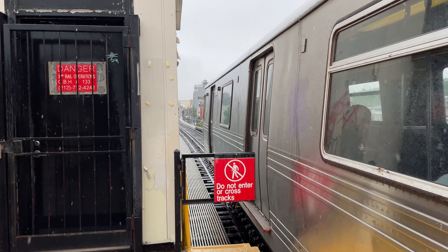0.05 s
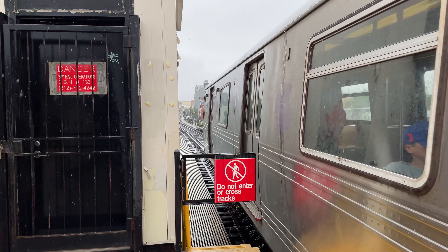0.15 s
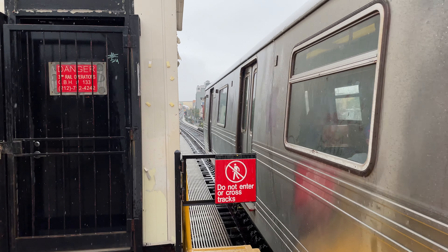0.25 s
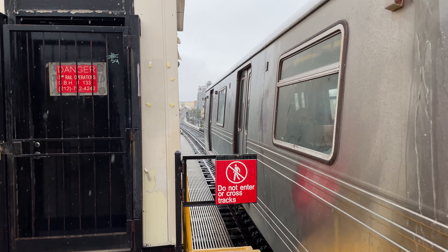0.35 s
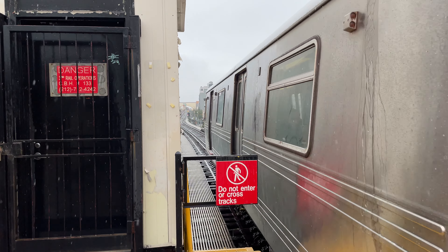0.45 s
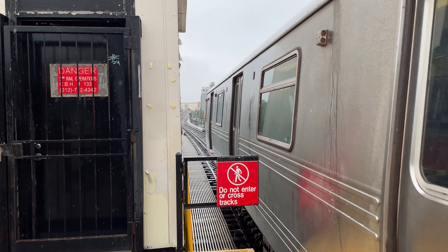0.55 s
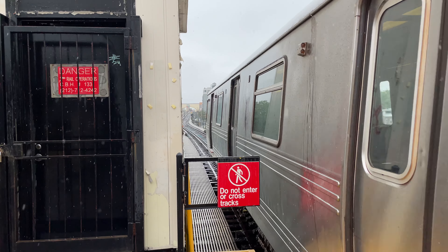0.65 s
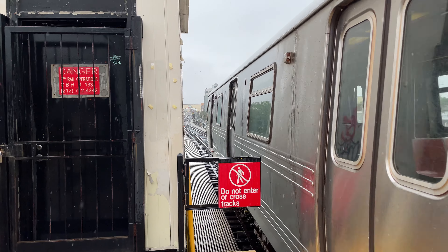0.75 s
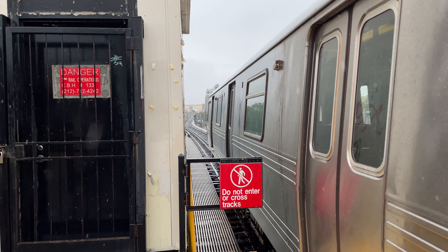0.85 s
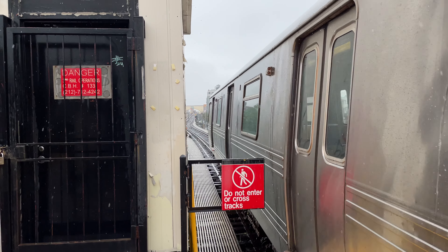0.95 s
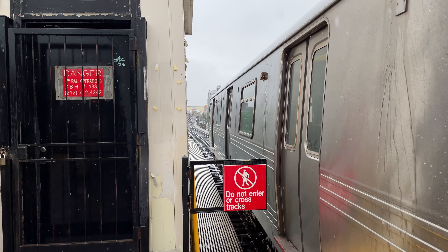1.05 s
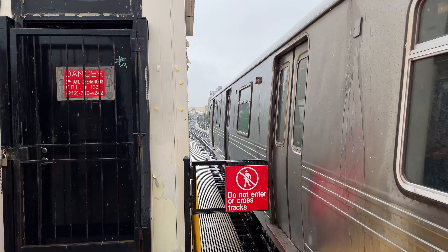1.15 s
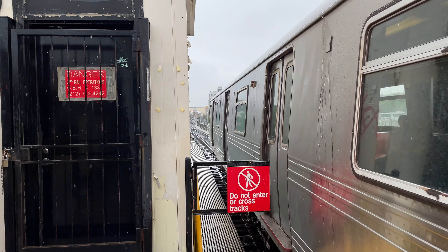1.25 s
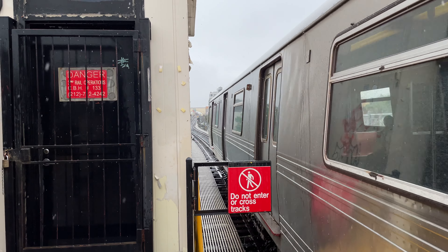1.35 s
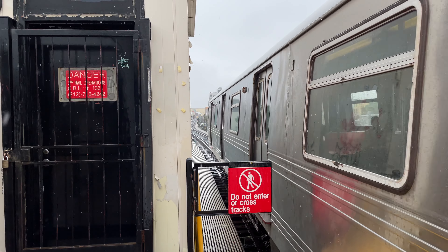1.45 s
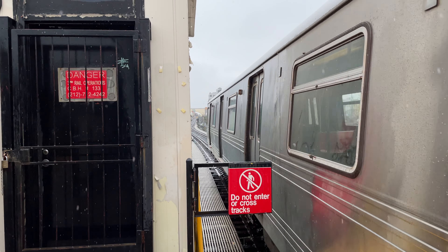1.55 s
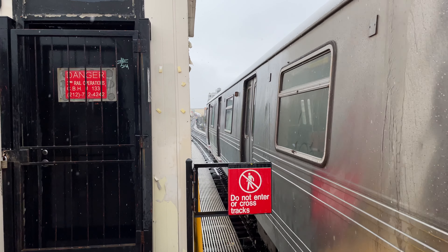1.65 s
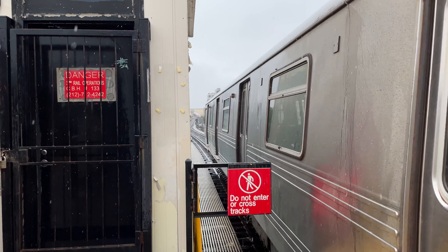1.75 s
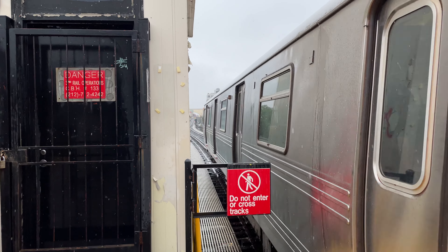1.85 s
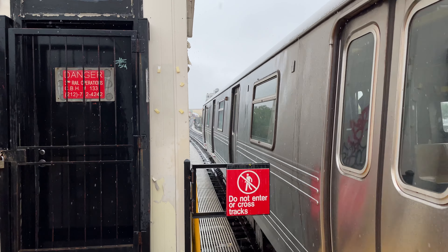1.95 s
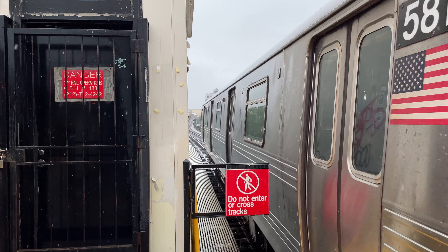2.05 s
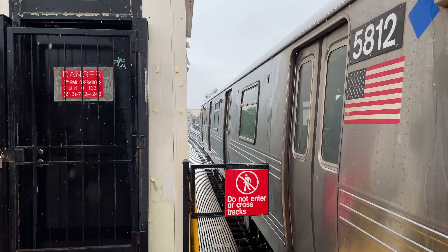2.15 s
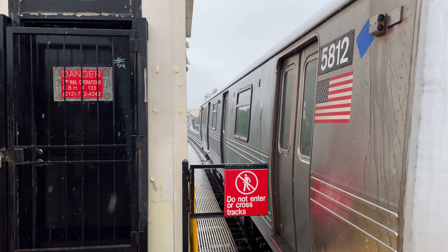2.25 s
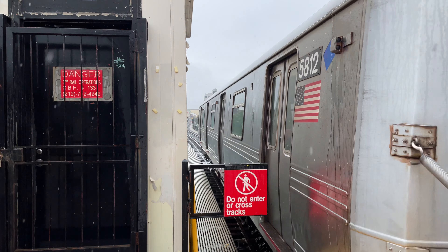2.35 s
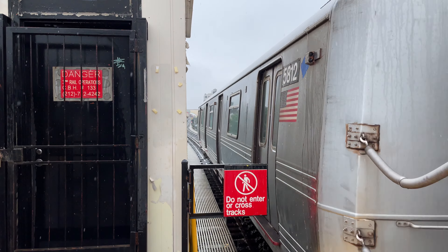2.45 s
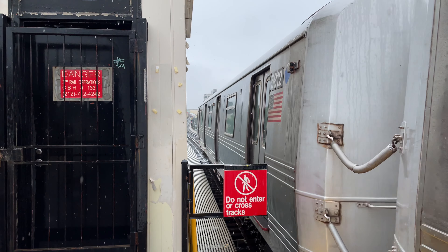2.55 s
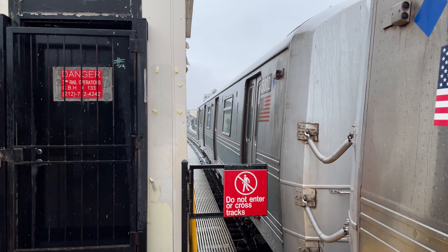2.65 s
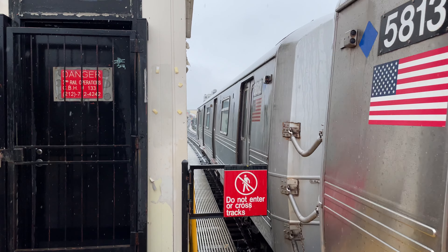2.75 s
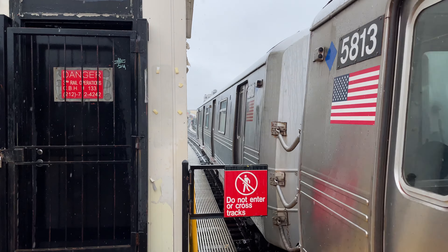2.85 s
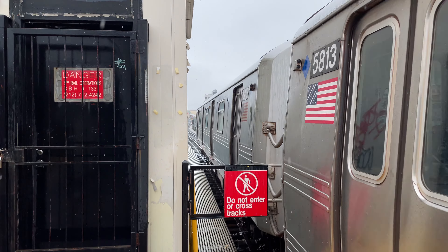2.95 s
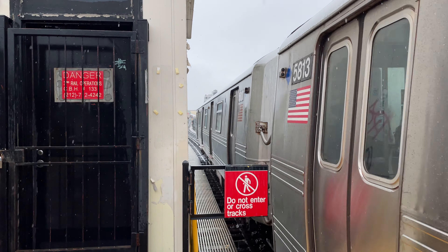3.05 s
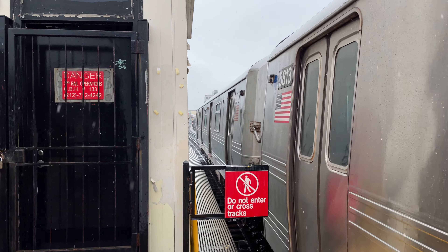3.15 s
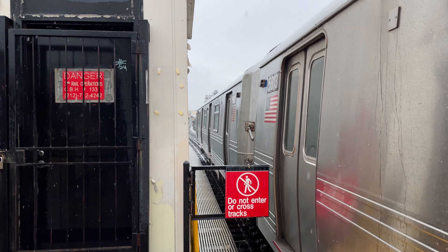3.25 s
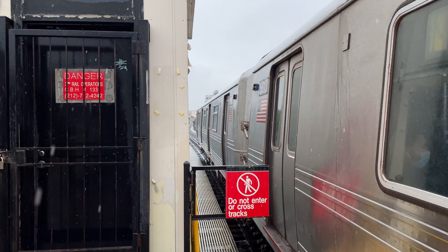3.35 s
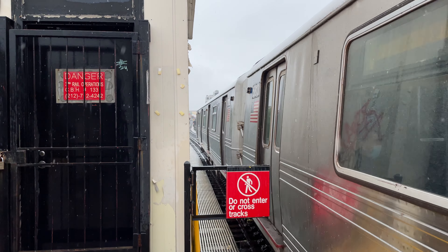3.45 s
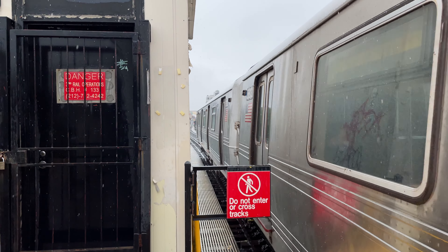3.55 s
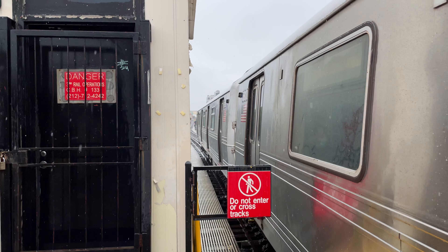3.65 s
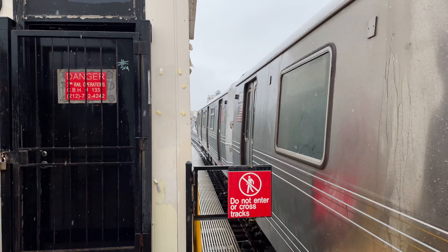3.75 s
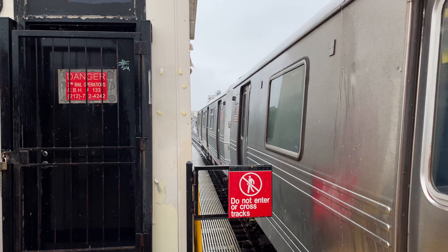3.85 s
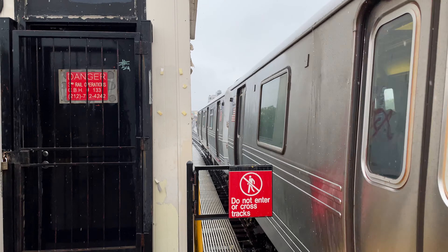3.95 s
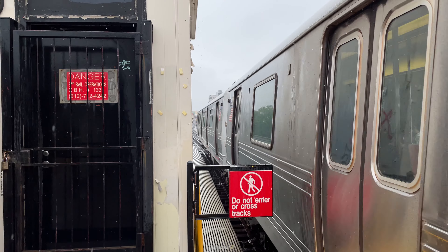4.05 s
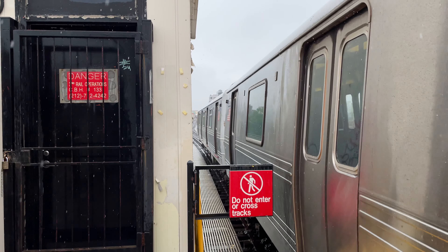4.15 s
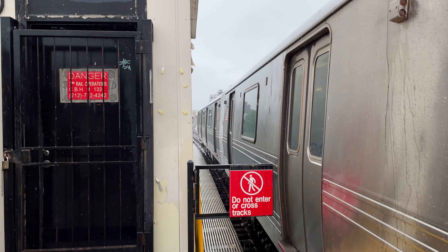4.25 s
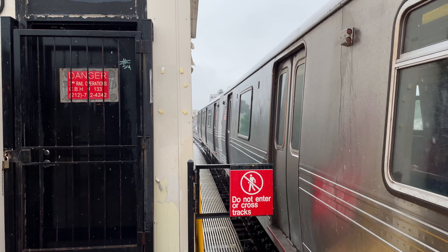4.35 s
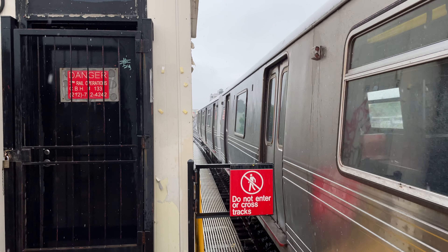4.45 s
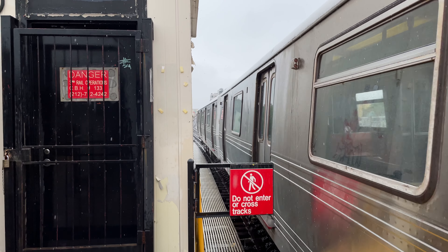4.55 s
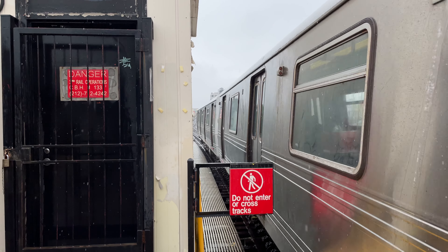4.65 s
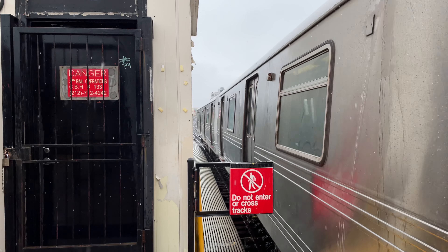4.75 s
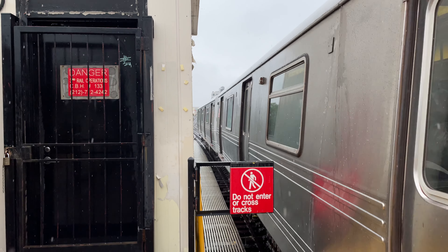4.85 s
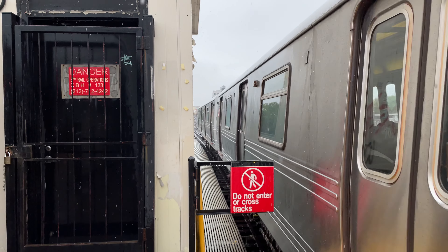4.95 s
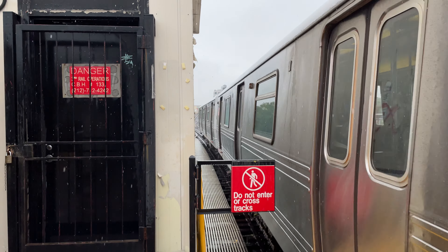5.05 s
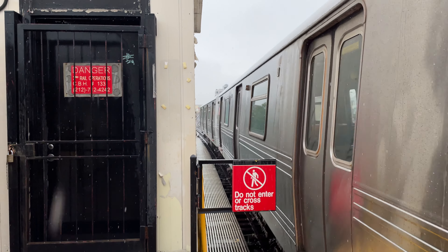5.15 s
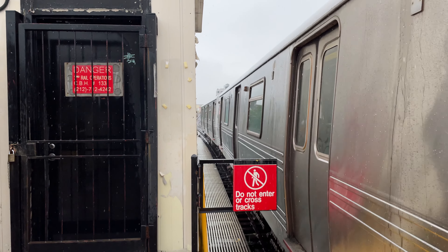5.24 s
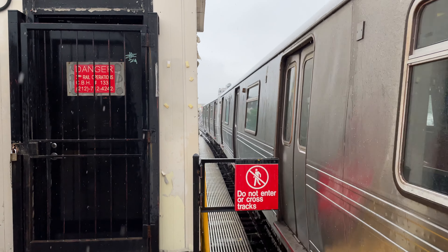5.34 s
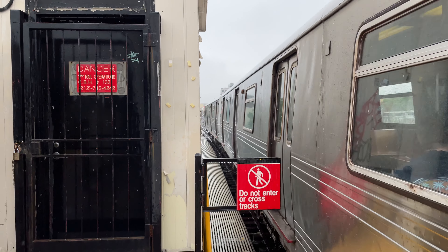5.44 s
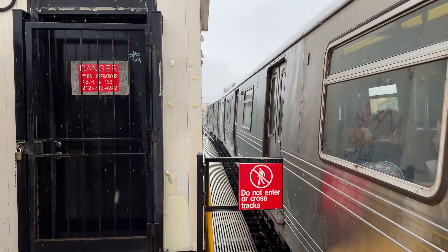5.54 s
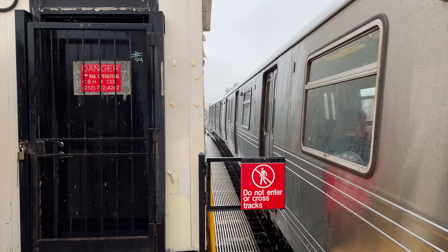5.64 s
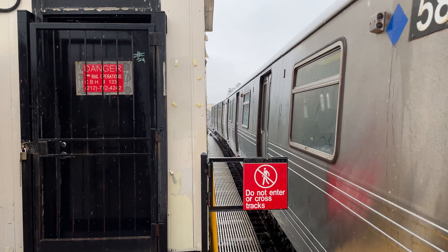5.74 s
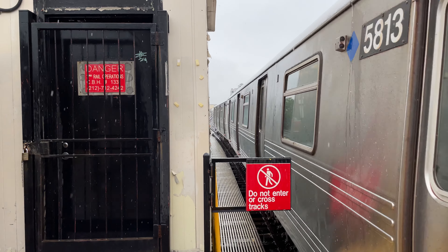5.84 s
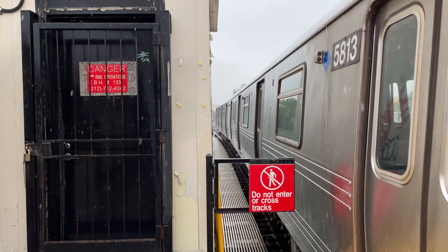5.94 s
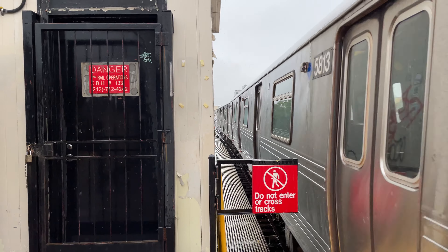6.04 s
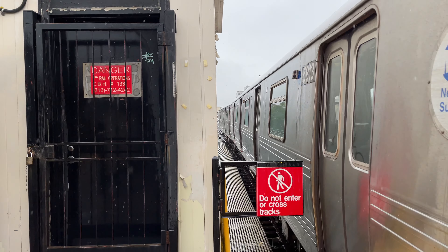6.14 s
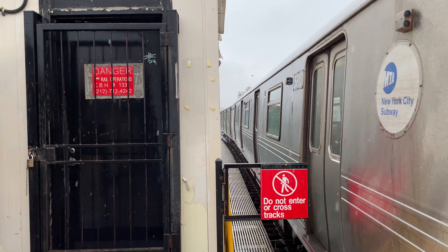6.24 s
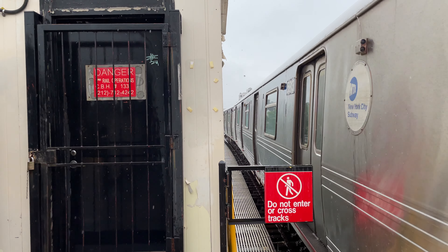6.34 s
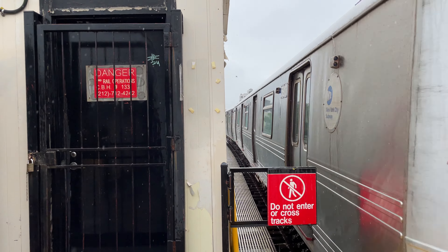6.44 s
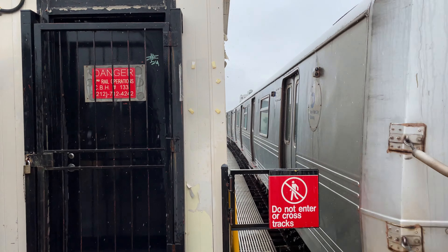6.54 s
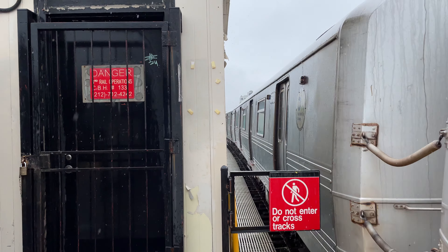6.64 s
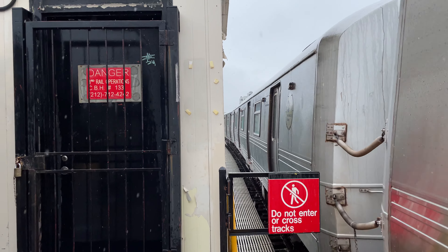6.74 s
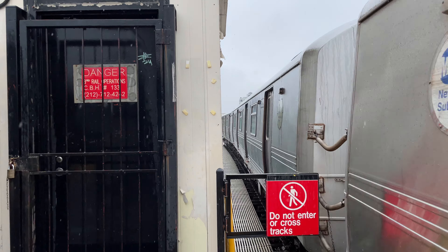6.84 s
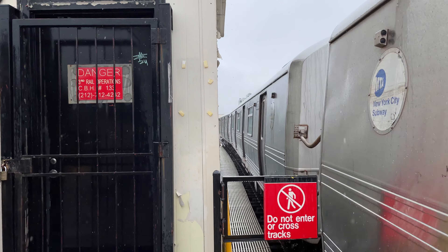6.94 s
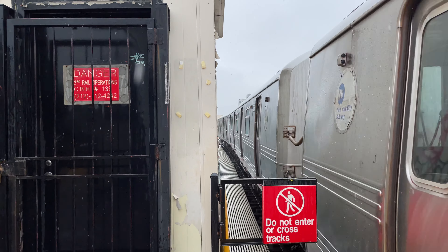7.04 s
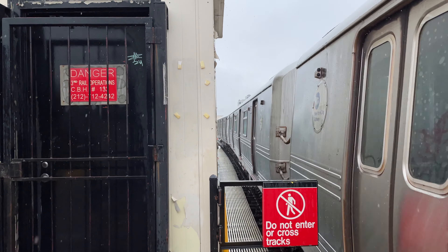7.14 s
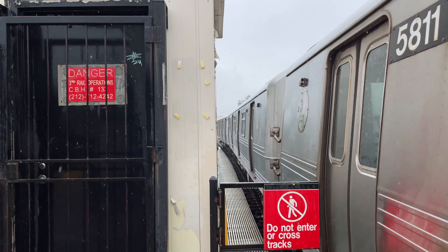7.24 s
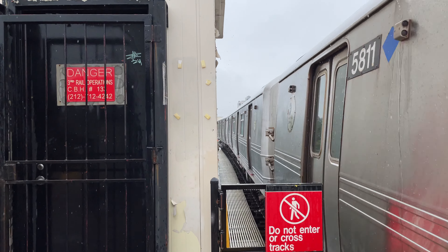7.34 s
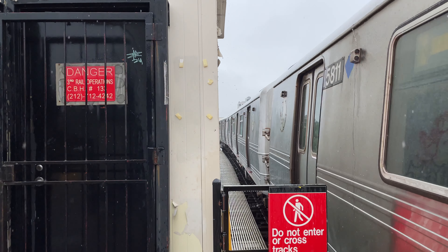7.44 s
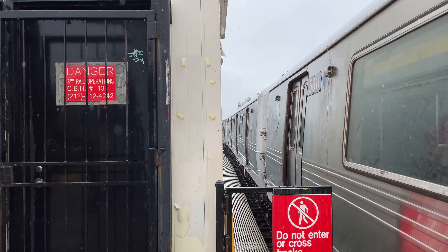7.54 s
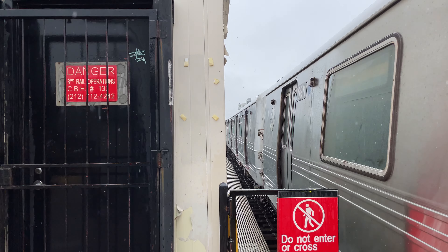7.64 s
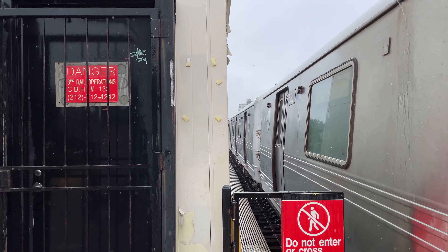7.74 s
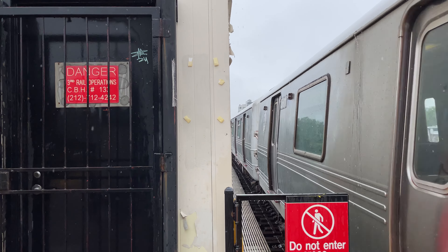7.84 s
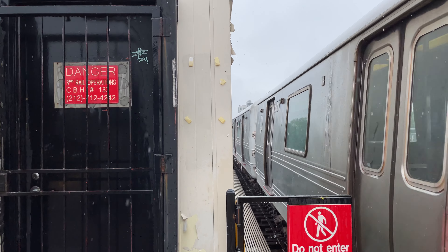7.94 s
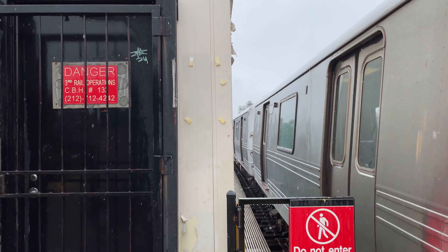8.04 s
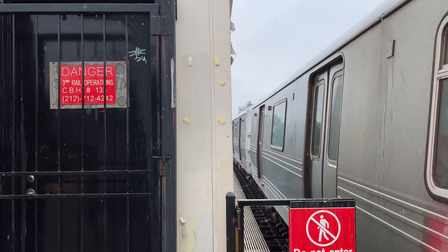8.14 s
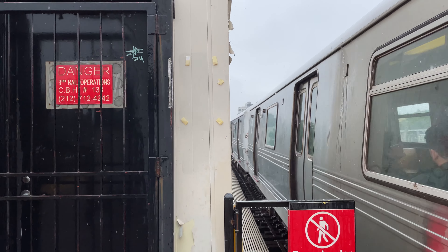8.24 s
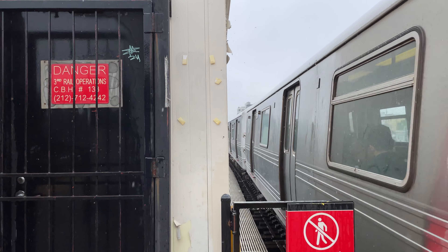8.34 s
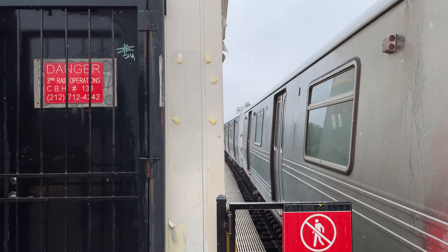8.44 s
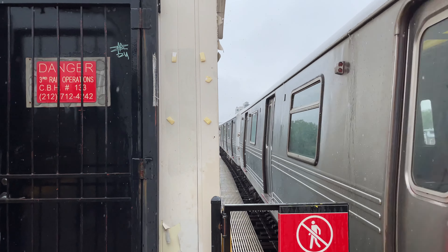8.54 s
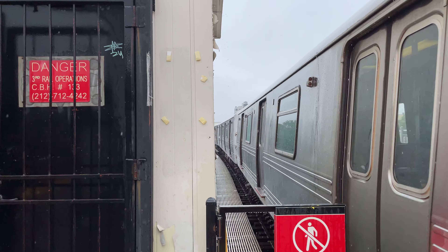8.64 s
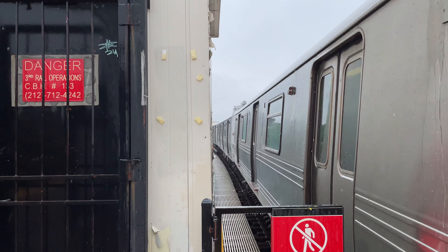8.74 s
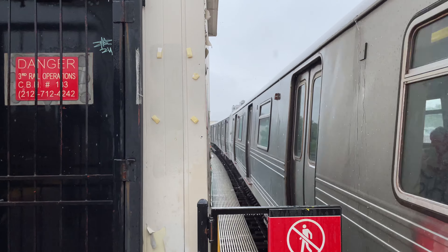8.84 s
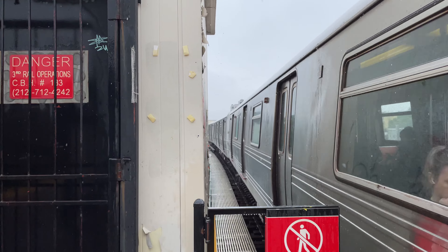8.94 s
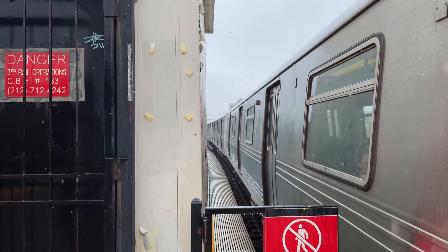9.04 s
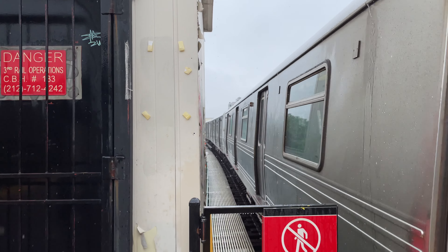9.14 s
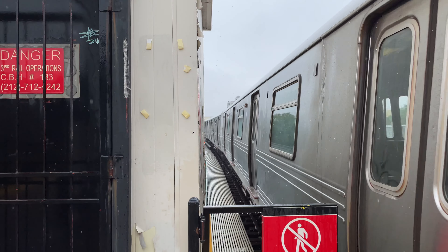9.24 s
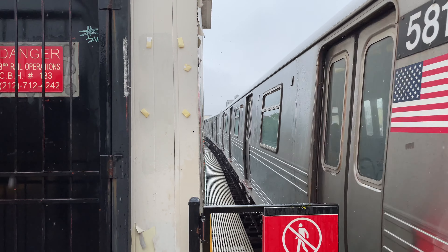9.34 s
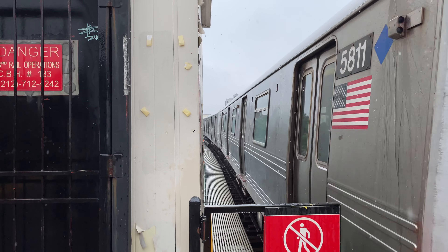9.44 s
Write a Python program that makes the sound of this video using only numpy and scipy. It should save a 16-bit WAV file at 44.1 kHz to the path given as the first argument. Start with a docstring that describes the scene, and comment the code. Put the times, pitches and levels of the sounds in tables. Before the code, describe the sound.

A subway train gathers speed close by on an elevated platform, motor gears whining upward over a deep rumble as wheels clack and thud across a rail joint.

```python
"""Elevated platform, two microphone ports of a phone an arm's length from a subway train gathering speed.
From the start air hisses under the cars, the steel viaduct rumbles, wheels roar and motor gears whine upward.
Soon axle after axle clacks, rings and thuds over a rail joint; a hum goes by, then suspension parts groan.
A flange chirps thinly against the rail, the strongest air jet blows by and small metal parts tick;
the whine and the joint blows are loudest near the end. Shaped noise, damped modes and sines make it all."""
import sys
import numpy as np
from scipy import signal
from scipy.fft import rfft, irfft
from scipy.io import wavfile
from scipy.ndimage import uniform_filter1d

SR = 44100
rng = np.random.default_rng(int(sys.argv[2]) if len(sys.argv) > 2 else 0)


def materialize(psi):
    """Save the field psi as 16-bit PCM at rate SR to the path in sys.argv[1].

    A 1-D psi becomes a single channel; in a 2-D psi each row is a channel.
    """
    bounded = np.clip(np.atleast_2d(psi).T, -1, 1)
    quanta = np.round(bounded * 32767).astype(np.int16)
    wavfile.write(sys.argv[1], SR, quanta)


N = 418509
TIME = np.arange(N) / SR  # s
FREQ = np.maximum(np.fft.rfftfreq(N, 1 / SR), 1)  # Hz, kept above zero for the logarithms

# gear mesh, in step with the train's speed: (time [s], pitch [Hz])
MESH_PITCH = [(0, 563), (.55, 593), (1.2, 632), (3, 699.7), (5.2, 773), (5.8, 815), (6.3, 870), (7.05, 970),
              (8.1, 1045), (8.8, 1128), (9.49, 1172)]
# wheels on joints: (time [s], relative clack level [dB], relative ring level [dB], deck thud level [dB])
JOINT_BLOWS = [(1.485, -26, -50, -18.5), (2.163, -20, -33, -15), (2.573, -16.5, -27.5, -13.5),
               (3.003, -23.5, -43, -17), (3.394, -17.5, -31.5, -12), (3.779, -16.5, -30, -13.5),
               (4.183, -22, -45, -16.5), (5.532, -32, -46, -24), (5.717, -24.5, -39, -20),
               (6.259, -19, -34, -13), (6.578, -14.5, -22, -8.5), (6.896, -22.5, -36, -17),
               (7.181, -17.5, -22.5, -10.5), (7.461, -14.5, -21, -9.5), (7.747, -20, -36.5, -14),
               (8.23, -26, -43, -14), (9.23, -15, -18, -11.5), (9.469, -12.5, -15.5, -9.5)]
# motor bogies coming into earshot: (loudest at [s], time from there to half gain [s],
# relative wheel singing level [dB], casing drone level [dB], rolling roar level [dB])
BOGIE_PASSES = [(1.32, 1, -63, -55, -54), (2.2, 0.46, -45.5, -45, -42), (3.0, 0.44, -48, -33.5, -54),
                (5.745, 0.56, -44, -30, -43), (6.598, 0.49, -45, -32, -47), (7.56, 0.46, -42.5, -29.5, -51),
                (9.345, 0.98, -50, -27, -32.5)]
# wheel modes: (frequency [Hz], width or spread among the wheels [Hz], relative level [dB])
WHEEL_MODES = [(990, 130, -7), (1150, 130, -6), (1310, 150, -3), (1480, 140, -8), (1690, 160, -2),
               (1832, 70, 3), (1907, 80, 3.5), (2038, 130, 1), (2220, 190, -3.5), (2406, 100, -5),
               (2615, 60, -4.5), (3140, 140, -3.5), (3396, 110, -3.5), (3930, 150, -8), (4086, 60, -6.5),
               (4850, 140, -10)]
# colour of the car bodies: (frequency [Hz], relative level [dB])
BODY_COLOUR = [(70, -9.5), (120, 3.5), (165, 0.5), (225, -3), (330, -4.5), (440, -7.5), (600, -16),
               (900, -34.5), (1800, -85)]
# colour of a clack: (frequency [Hz], relative level [dB])
CLACK_COLOUR = [(200, 0.5), (500, 8), (780, 5.5), (1250, 7), (2300, -5), (3300, -3), (4300, -29),
                (8000, -37)]
# roar against speed: (level at the starting speed [dB], rise per doubling of speed [dB])
ROAR_GROWTH = (-37.5, 5.1)


def undb(db):
    """Decibels to gain."""
    return 10 ** (np.asarray(db) / 20)


def curve(rows):
    """Points joined by straight lines in time."""
    return np.interp(TIME, *np.transpose(rows))


def across(points):
    """Points joined by straight lines over log frequency."""
    hz, value = np.transpose(points)
    return np.interp(np.log(FREQ), np.log(hz), value)


def resonances(modes):
    """Power response of a few damped modes."""
    return sum(undb(db) ** 2 / (1 + ((FREQ - hz ** 2 / FREQ) / width) ** 2) for hz, width, db in modes)


def unit(x):
    """Scale to rms 1."""
    return x / np.sqrt(np.mean(x ** 2))


def walk(rate, size=8192):
    """Smooth chance with rms 1, changing about rate times a second."""
    hz = np.fft.rfftfreq(size, TIME[-1] / size)
    slow = irfft(rfft(rng.standard_normal(size)) * np.exp(-(hz / rate) ** 2))
    return unit(np.interp(TIME, np.linspace(0, TIME[-1], size), slow))


def noise(gain):
    """Random vibration with this frequency response, as the two microphone ports hear it; rms 1."""
    # likeness of the two ports: (frequency [Hz], correlation [0-1])
    port_likeness = [(50, 0.98), (220, 0.93), (400, 0.58), (700, 0), (1100, 0.35), (2100, 0.3), (2800, 0),
                     (4100, 0.24), (5500, 0), (8500, 0.95), (14000, 1)]
    alike = np.clip(across(port_likeness), 0, .995)
    white = rfft(rng.standard_normal((2, N)))
    mid, side = white * gain * np.sqrt([1 + alike, 1 - alike])
    return unit(irfft([mid + side, mid - side], N))


def blow(start, rise_s, fall_s):
    """Envelope of a blow: quick rise, exponential fall."""
    age = np.maximum(TIME - start, 0)
    return (1 - np.exp(-(age / rise_s) ** 2)) * np.exp(-age / fall_s)


def swell(start, length):
    """Envelope of a brief rub: rounded rise, hold, rounded fall."""
    return np.exp(-(2 * (TIME - start) / length - 1) ** 4)


def with_speed(law):
    """Level in dB of a sound that gains a fixed step with each doubling of the train's speed."""
    start_db, rise_db = law
    return start_db + rise_db * np.log2(curve(MESH_PITCH) / MESH_PITCH[0][1])


def passing(when, half_s):
    """Gain of a source that nears, goes by and is screened again by the platform edge."""
    return 1 / (1 + ((TIME - when) / half_s) ** 2)


def from_bogies(axis):
    """Gain of one column of the bogies' sounds: every bogie swells and fades, and their powers add."""
    return np.sqrt(sum((undb(row[axis]) * passing(row[0], row[1])) ** 2 for row in BOGIE_PASSES))


def viaduct(steadiness=0.048):
    """The girders are shaken without pause, harder with speed; their boom is evened out slightly."""
    # colour of the girders: (frequency [Hz], relative level [dB])
    girder_colour = [(20, -35), (32, -21), (46, 6), (60, 8), (78, 7.5), (96, -1), (130, -18.5), (220, -61),
                     (1000, -100)]
    # boom against speed: (level at the starting speed [dB], rise per doubling of speed [dB])
    boom_growth = (-24.5, 8)
    boom = noise(undb(across(girder_colour)))
    strength = np.sqrt(uniform_filter1d(np.mean(boom ** 2, axis=0), SR // 30))
    return unit(boom / strength ** steadiness) * undb(with_speed(boom_growth))


def car_bodies(throb_db=1.48):
    """Rough treads shake the car bodies, which drone with a slow random throb."""
    # drone before its throb: (time [s], level [dB])
    drone_level = [(0, -24.5), (.8, -27), (1.3, -25.5), (3.2, -27.5), (5.2, -24.5), (6.2, -23.5),
                   (7.3, -22.5), (8.2, -21.5), (9.49, -17.5)]
    return noise(undb(across(BODY_COLOUR))) * undb(curve(drone_level) + throb_db * walk(6.9))


def treads(sway_db=1.05, grit_db=0.53, scour_db=-3):
    """Rough treads roar and scour the rail, louder with speed and near a bogie."""
    # colours of roar and scouring: (frequency [Hz], relative level [dB])
    roar_colour = [(300, -20), (600, 1.5), (950, 2.5), (1500, -2.5), (2200, -4.5), (2800, -6), (4000, -14),
                   (8000, -38), (12500, -43), (14500, -58)]
    sizzle_colour = [(1500, -34), (3000, 4), (4000, 5.5), (5200, 4), (6500, -1), (8300, -7.5),
                     (10000, -8.5), (13000, -16.5), (14800, -50)]
    # scouring against speed: (level at the starting speed [dB], rise per doubling of speed [dB])
    sizzle_growth = (-45, 5.1)
    load = sway_db * walk(19)  # the cars rock, pressing the wheels harder and softer
    roar_gain = np.hypot(undb(with_speed(ROAR_GROWTH)), from_bogies(axis=4))
    sizzle_gain = np.hypot(undb(with_speed(sizzle_growth)), undb(scour_db) * from_bogies(axis=2))
    roar = noise(undb(across(roar_colour))) * roar_gain * undb(load + grit_db * walk(45))
    sizzle = noise(undb(across(sizzle_colour))) * sizzle_gain * undb(.5 * load)
    return roar + sizzle


def hum(hz=666, waver=0.46, hum_db=-54, passes_s=4.1, half_s=0.12):
    """A steady machine under one car hums as it goes by: a sine with a wavering phase."""
    tone = np.sqrt(2) * np.sin(2 * np.pi * hz * TIME + waver * walk(5.4))
    return tone * undb(hum_db) * passing(passes_s, half_s)


def air():
    """Jets of air under the cars swell and fade as they pass: turbulent noise, slightly uneven."""
    # jets: (start [s], relative level [dB], rise [s], fall [s])
    jet_rows = [(0, -46.5, 0.0057, 1.5), (1.819, -43.5, 0.12, 1), (4.1, -34, 0.11, 0.56),
                (5.35, -40, 0.026, 0.17), (6.2, -34, 0.062, 0.16), (7.17, -28, 0.16, 0.41),
                (8.35, -36, 0.31, 1.5)]
    # colour of the hiss: (frequency [Hz], relative level [dB])
    hiss_colour = [(1000, -11), (3000, 4), (5500, 3.5), (8000, -2), (10500, -4.5), (13000, -8),
                   (15000, -28)]
    power = sum((undb(db) * blow(start, rise_s, fall_s)) ** 2 for start, db, rise_s, fall_s in jet_rows)
    return noise(undb(across(hiss_colour))) * np.sqrt(power) * undb(0.8 * walk(27))


def rattles(rattle_db=-13, scatter_db=10, fall_s=0.005, count=330):
    """Loose running gear and far wheels patter at random, each part at its own pitch, harder with speed."""
    # what rattles: (frequency [Hz], resonance width [Hz], relative level [dB])
    loose_parts = [(720, 370, 0), (1100, 780, 0), (1710, 1300, 0)]
    out = np.zeros((2, N))
    tap_shape = blow(0, 0.001, fall_s)[:SR // 10]
    for part in loose_parts:
        taps = np.zeros(N)
        for when, size in rng.random((count // len(loose_parts), 2)):
            taps[int(when * N)] += undb(scatter_db * (size + .5))
        force = signal.oaconvolve(taps, tap_shape)[:N]
        out += force * noise(resonances([part]))
    return out * undb(with_speed(ROAR_GROWTH) + rattle_db)


def groans(rough=0.93):
    """Stiff suspension parts rub as the cars sway, in short low notes of rough phase."""
    # groans: (start [s], length [s], pitch [Hz], level [dB])
    groan_rows = [(5.527, 0.024, 325, -21.5), (6.078, 0.03, 548, -28), (8.594, .04, 545, -32),
                  (8.74, 0.074, 607, -34), (8.82, .07, 560, -32), (8.838, 0.071, 632, -30)]
    out = np.zeros(N)
    for start, length, hz, db in groan_rows:
        tone = np.sin(2 * np.pi * hz * TIME + rough * walk(91))
        out += undb(db) * swell(start, length) * tone
    return np.sqrt(2) * out


def ticks(hz=4500, width=1800, fall_s=0.0059):
    """A loose small part of the running gear taps as a bogie leaves: short bursts in one high mode."""
    # ticks: (time [s], level [dB])
    tick_rows = [(7.82, -26.5), (7.914, -29), (7.97, -29), (8.053, -29), (8.187, -30), (8.283, -29)]
    force = sum(undb(db) * blow(start, 0.00044, fall_s) for start, db in tick_rows)
    return force * noise(resonances([(hz, width, 0)]))


def knocks(fall_s=0.01, again_s=0.0203, again=.4):
    """Loose couplings and shoes knock dully under the cars and settle with a second, weaker tap."""
    # knocks: (time [s], level [dB])
    knock_rows = [(.069, -28.5), (1.905, -28), (4.119, -33), (4.225, -29), (4.263, -29), (4.299, -30.5),
                  (4.609, -25.5), (5.36, -28), (6.083, -23), (6.374, -28), (7.775, -24)]
    force = np.zeros(N)
    for start, db in knock_rows:
        first = blow(start, 0.0012, fall_s)
        second = again * blow(start + again_s, .001, fall_s)
        force += undb(db) * (first + second)
    return force * noise(undb(across(CLACK_COLOUR)))


def flange(focus_octaves=.25, stutter_db=3):
    """A flange grazes the rail and sings unsteadily; every graze favours other high modes of the wheel."""
    # chirps: (start [s], length [s], level before the stutter [dB], favoured pitch [Hz])
    chirp_rows = [(5.8, .035, -49, 11600), (6.315, 0.05, -44, 10700), (6.35, 0.14, -43, 9100),
                  (6.634, 0.086, -46.5, 9100), (6.929, 0.045, -49, 10500)]
    # flange ring: (frequency [Hz], width [Hz], relative level [dB])
    flange_modes = [(9200, 280, -1), (10400, 900, -11), (14100, 300, -1)]
    modes = sum(undb(db) * resonances([(hz, width, 0)]) for hz, width, db in flange_modes)
    out = np.zeros((2, N))
    for start, length, db, hz in chirp_rows:
        focus = 1 / (1 + (np.log2(FREQ / hz) / focus_octaves) ** 2)
        out += undb(db) * swell(start, length) * noise(modes * focus)
    return out * undb(stutter_db * walk(70))


def motor_casings(flutter_db=2.5):
    """Motor casings drone in their own modes, coloured by the car bodies, as each bogie passes."""
    # motor casing: (frequency [Hz], width [Hz], relative level [dB])
    casing_modes = [(315, 27, -4), (445, 61, -8), (556, 32, -3.5)]
    casing = noise(np.sqrt(resonances(casing_modes)) * undb(across(BODY_COLOUR)))
    return casing * from_bogies(axis=3) * undb(flutter_db * walk(13.0))


def wheel_tones(wander=.25, blur_hz=18, turns_db=4, skew=1.0):
    """Single modes stand out by turns as narrow tones, their pitch shifting from wheel to wheel."""
    out = np.zeros((2, N))
    for hz, spread, db in WHEEL_MODES:
        pitch = hz + wander * spread * walk(2)
        phase = 2 * np.pi * np.cumsum(pitch) / SR + walk(blur_hz)
        level = undb(db + turns_db * walk(7.3)) * walk(blur_hz)
        out += level * np.sin([phase, phase + skew * walk(12)])
    return unit(out)


def wheel_singing(sing_db=-2.0, tones_db=-6, flutter_db=2.5):
    """Rolling wheels sing in their modes, louder with speed and most when a bogie is close."""
    # singing against speed: (relative level at the starting speed [dB], rise per doubling of speed [dB])
    sing_growth = (-55.5, 12)
    blurred = noise(resonances(WHEEL_MODES))  # power response used as gain: dark valleys between the modes
    gain = np.hypot(undb(with_speed(sing_growth)), from_bogies(axis=2))
    blurred = blurred * undb(sing_db + flutter_db * walk(6.7))
    return gain * (blurred + wheel_tones() * undb(tones_db))


def gears(spread=.017, waver=0.006, flutter=0.8, patchy_db=3, whine_db=-1, throb_db=1.5, others=.75):
    """Motors on slightly different wheel sizes whine side by side; reflections make each port flutter."""
    # overtones of the mesh: (multiple, relative level [dB])
    overtones = [(1, 2), (2, -12), (4, -16)]
    # swelling as motors pass and the platform edge hides them: (time [s], relative level [dB])
    whine_level = [(0, -53), (.55, -43.5), (1.25, -39.5), (1.42, -45), (1.65, -40), (2.1, -42.5),
                   (2.55, -49), (2.88, -40), (3.08, -47), (3.27, -40.5), (3.7, -54), (4.9, -49),
                   (5.25, -41), (5.55, -47), (5.8, -39), (6.15, -40), (6.4, -36.5), (6.58, -39),
                   (6.72, -32), (6.85, -33), (7.1, -45), (7.7, -39), (8.45, -49), (8.8, -34), (9.05, -34.5),
                   (9.2, -29), (9.49, -29.5)]
    gear_teeth = 120  # meshes per turn of the axle
    out = np.zeros((2, N))
    for size in (-1, 0, 1):
        pitch = curve(MESH_PITCH) * (1 + spread * size + waver * walk(12.43))
        phase = 2 * np.pi * np.cumsum(pitch) / SR
        throb = undb(throb_db * np.sin(phase / gear_teeth))  # once per axle turn
        for multiple, db in overtones:
            paths = np.array([1 + flutter * (walk(24) + 1j * walk(21)) for _ in range(2)])
            tone = np.real(paths * np.exp(1j * multiple * phase))
            out += others ** abs(size) * undb(db) * throb * tone
    # broken at low speed, steadier later
    patches = patchy_db * walk(6.3) * (MESH_PITCH[0][1] / curve(MESH_PITCH)) ** 2
    return unit(out * undb(patches)) * undb(curve(whine_level) + whine_db)


def wheel_ring(fall_s=0.018, linger=0.3, linger_s=0.078, uneven_db=4, beat_hz=45, beat=.4, size=12288):
    """One struck wheel: pairs of modes, tuned and excited anew each time, beating as the wheel turns."""
    age = np.arange(size) / SR
    out = np.zeros((2, size))
    for hz, spread, db in WHEEL_MODES + WHEEL_MODES:
        detune, turn, skew, share, pace = rng.uniform(-1.01, 1, 5)
        phase = 2 * np.pi * (hz + .5 * spread * detune) * age + np.pi * turn
        beating = 1 + beat * np.cos(2 * np.pi * beat_hz * 2 ** pace * age)
        out += undb(db + uneven_db * share) * beating * np.sin([phase, phase + skew])
    # the rail damps most of the ring at once; a little lingers
    fade = np.exp(-age / fall_s) + linger * np.exp(-age / linger_s)
    onset = 1 - np.exp(-age / 0.0011)
    return out / np.sqrt(np.mean(out[:, age < fall_s] ** 2)) * fade * onset


def axles(hz=235, bounce_db=6, fall_s=0.012, late_s=0.0025):
    """The axle bounces on the rail after each blow: a short, low punch, strong after the hard ones."""
    out = np.zeros(N)
    for start, _, ring, _ in JOINT_BLOWS:
        tone = np.sin(2 * np.pi * hz * (TIME - start))
        out += undb(ring + bounce_db) * blow(start + late_s, 0.0014, fall_s) * tone
    return out


def cracks(crack_db=0.5, hz=2100, width=1500, fall_s=0.0037, again_s=0.0085, again=0.98):
    """Steel meets steel: a hard crack as the tread hits the rail end, and a slightly weaker one as it settles."""
    force = np.zeros(N)
    for start, _, ring, _ in JOINT_BLOWS:
        hit = blow(start + 0.0004, 0.00015, fall_s)
        settling = again * blow(start + again_s, 0.00019, fall_s)
        force += undb(ring + crack_db) * (hit + settling)
    return force * noise(resonances([(hz, width, 0)]))


def joints(clack_db=-2.5, ring_db=0.7, tail_db=-14, rebound_s=0.0067, rebound=0.2, chatter_db=4,
           rise_s=0.00076, blunt_db=15):
    """A wheel drops into the gap and rebounds; it rings, the deck thuds later, the bogie chatters on."""
    # colours of deck thud and bright edge: (frequency [Hz], relative level [dB])
    thud_colour = [(35, -43), (65, 6.5), (105, 1.5), (155, 3.5), (220, -1), (300, -7), (500, -9),
                   (1000, -61)]
    edge_colour = [(2000, -21), (4500, 2.5), (6500, -4.5), (9000, -9.5), (13000, -11.5), (16000, -40)]
    # the bright edge follows the ring: (level for a ring of 0 dB [dB], slope [dB per dB])
    edge_law = (-15, 0.72)
    clack, thud, edge = np.zeros((3, N))
    wheels = np.zeros((2, N))
    chatter = undb(tail_db + chatter_db * walk(90))
    hardest = max(row[1] for row in JOINT_BLOWS)
    for start, peak, ring, deck in JOINT_BLOWS:
        # weak blows come from farther off and arrive blunted: ten times slower for every blunt_db
        rise = rise_s * 10 ** ((hardest - peak) / blunt_db)
        onset = start - .0015 - rise
        strike = blow(onset, rise, 0.02) + rebound * blow(start + rebound_s, 0.0057, 0.048)
        clack += undb(peak + clack_db) * (strike + chatter * blow(start, 0.027, 0.066))
        edge_shape = blow(onset, 2 * rise, 0.022) + 0.25 * blow(start, 0.0035, 0.067)
        edge += undb(edge_law[0] + edge_law[1] * ring) * edge_shape
        thud += undb(deck) * blow(start, 0.0036, 0.042)
        first = int(start * SR)
        tone = wheel_ring()[:, :N - first]
        wheels[:, first:first + tone.shape[1]] += undb(ring + ring_db) * tone
    layers = ((clack, CLACK_COLOUR), (thud, thud_colour), (edge, edge_colour))
    return wheels + sum(force * noise(undb(across(colour))) for force, colour in layers)


def scene():
    """Everything that the passing train sounds, from the background to the joints."""
    background = viaduct() + car_bodies() + treads() + hum() + air()
    loose_parts = rattles() + groans() + ticks() + knocks()
    wheels_and_motors = flange() + motor_casings() + wheel_singing() + gears()
    return background + loose_parts + wheels_and_motors + axles() + cracks() + joints()


def record(dry):
    """The right port is nearer the train, its treble shaded; the phone rounds the peaks and cuts the top."""
    # shading of the right port: (frequency [Hz], gain [dB])
    right_shade = [(60, 0.3), (250, 1.5), (550, -1.8), (1300, 0.9), (2400, 1), (2950, -6), (3900, 0.5),
                   (4300, -1), (4900, -16.5), (5600, -11), (6800, -8.5), (8800, 0)]
    # lead of the right port, negative where it hears later: (frequency [Hz], lead [ms])
    right_lead = [(380, -0.07), (850, -0.0039), (1200, 0.17), (2000, 0.048), (2500, 0.00038), (4100, 0.012),
                  (6200, 0.1766)]
    top_hz = 15750
    port = undb(across(right_shade)) * np.exp(2j * np.pi * FREQ * across(right_lead) / 1000)
    taps = np.roll(irfft(port, N), 256)[:513]  # centred, so the filter adds no delay of its own
    pair = np.array([dry[0], signal.fftconvolve(dry[1], taps, mode="same")])
    pair = pair / (1 + (pair / .92) ** 8) ** (1 / 8)  # soft ceiling at 0.92
    low_pass = signal.ellip(10, .2, 80, top_hz, fs=SR, output="sos")
    return signal.sosfilt(low_pass, pair)


dry = scene()
out = record(dry)
materialize(out)
```